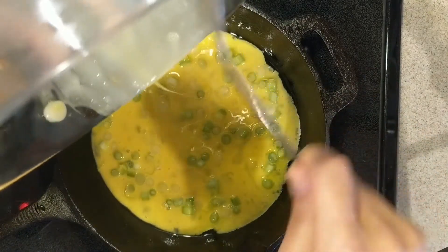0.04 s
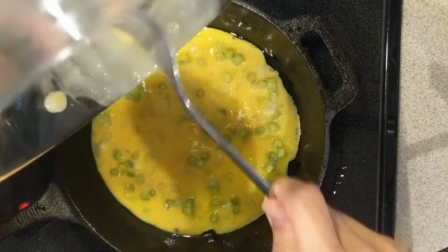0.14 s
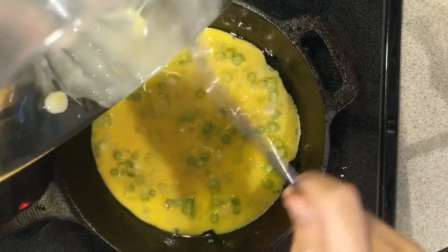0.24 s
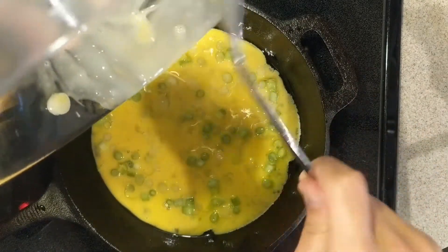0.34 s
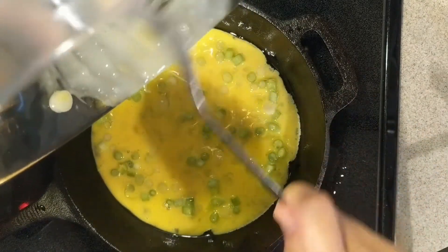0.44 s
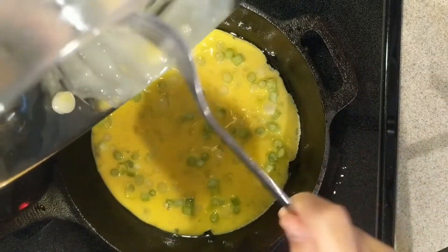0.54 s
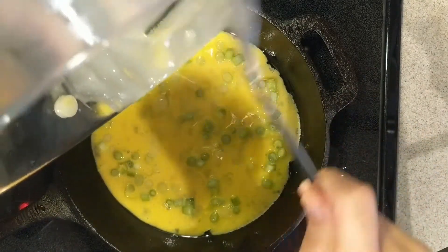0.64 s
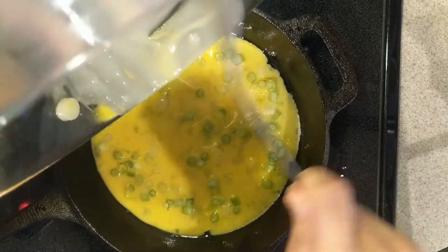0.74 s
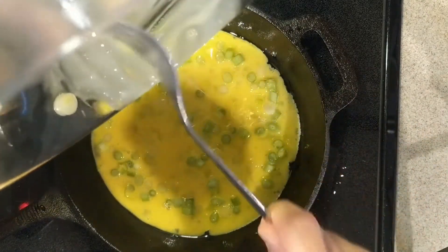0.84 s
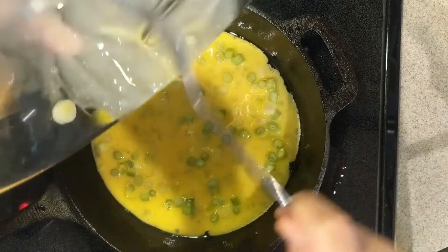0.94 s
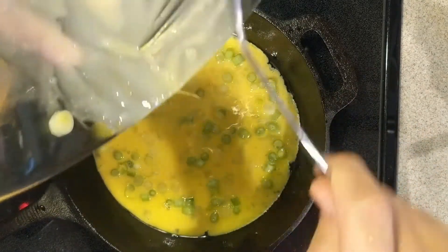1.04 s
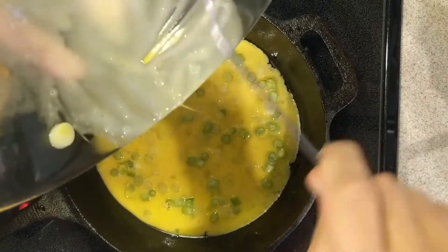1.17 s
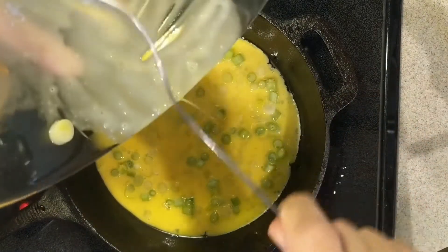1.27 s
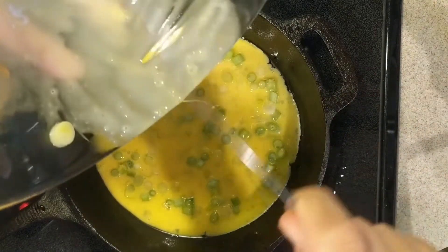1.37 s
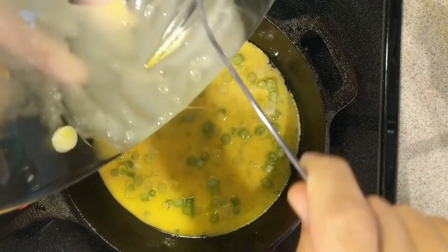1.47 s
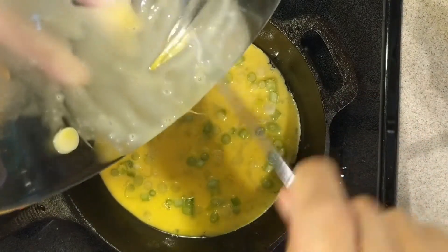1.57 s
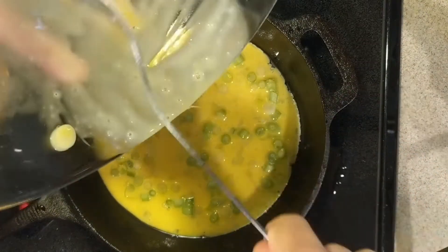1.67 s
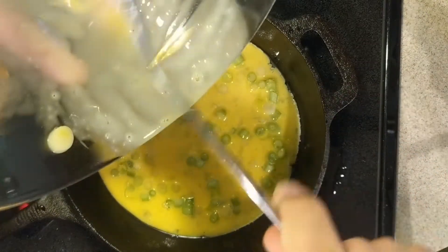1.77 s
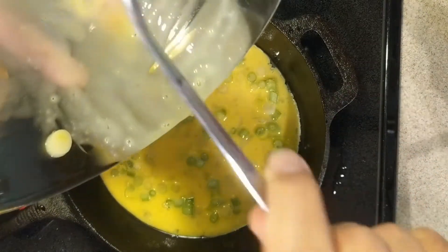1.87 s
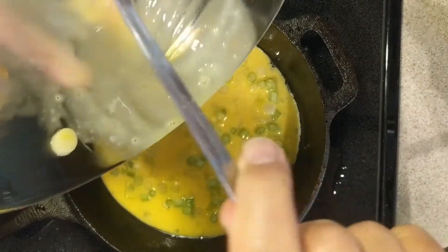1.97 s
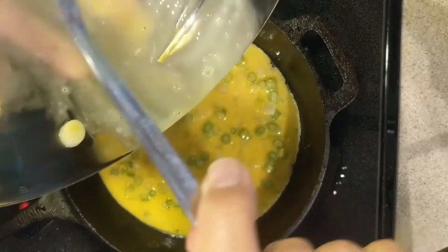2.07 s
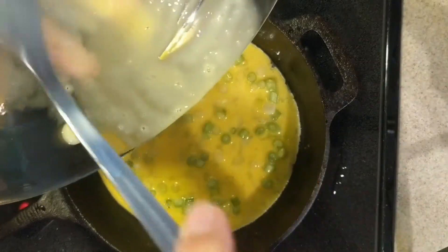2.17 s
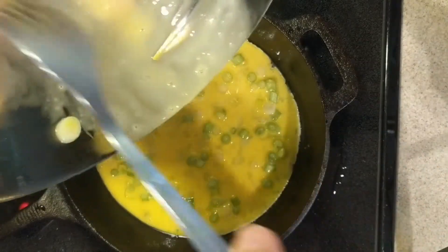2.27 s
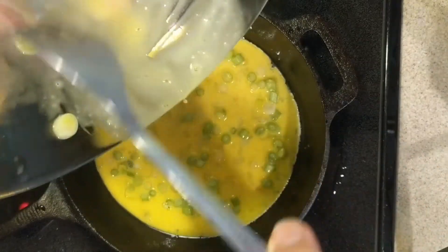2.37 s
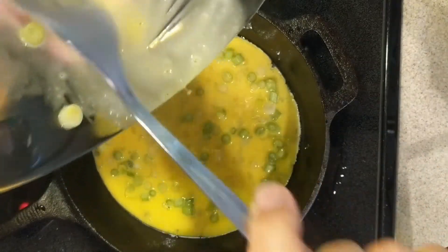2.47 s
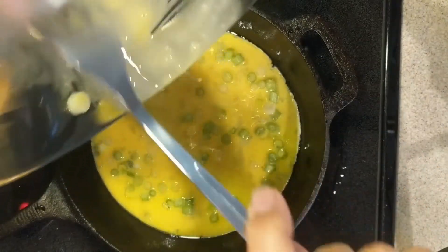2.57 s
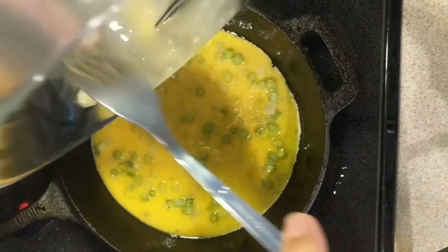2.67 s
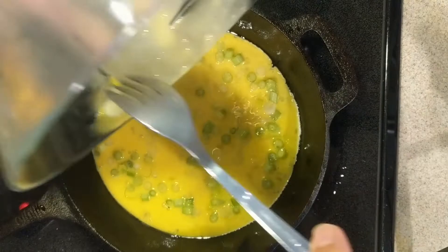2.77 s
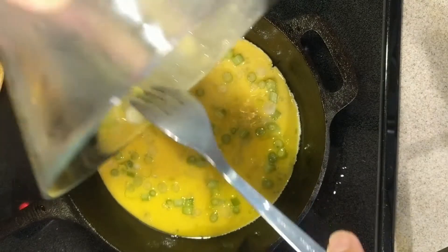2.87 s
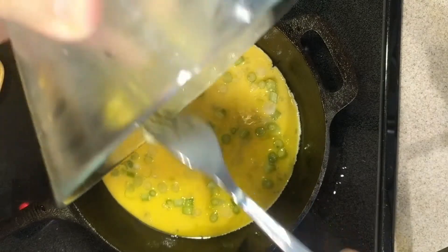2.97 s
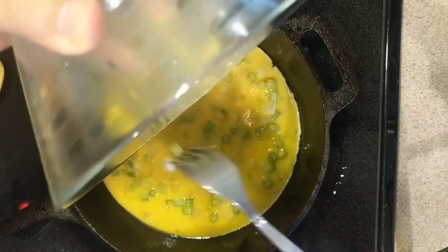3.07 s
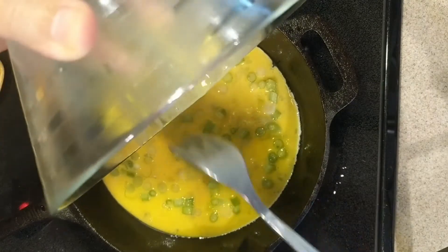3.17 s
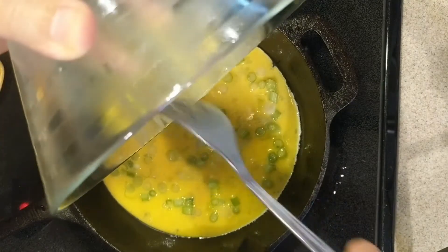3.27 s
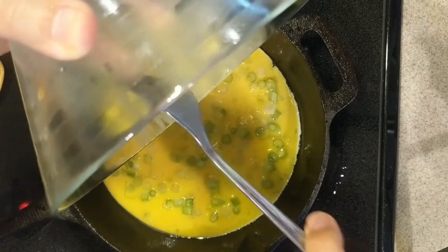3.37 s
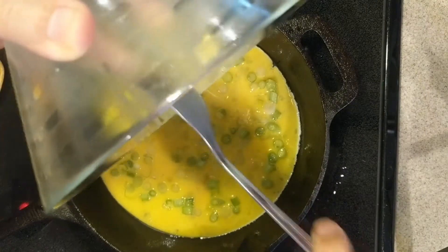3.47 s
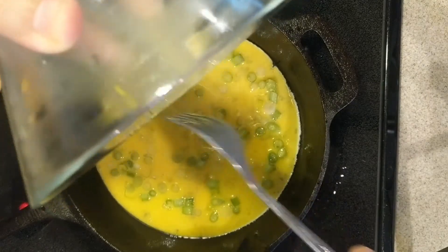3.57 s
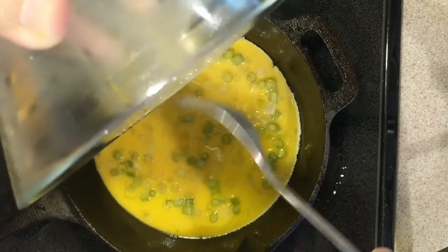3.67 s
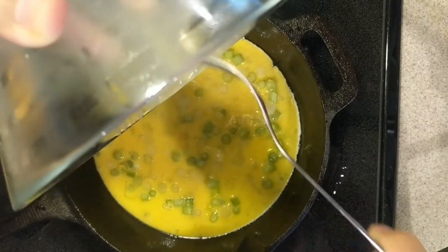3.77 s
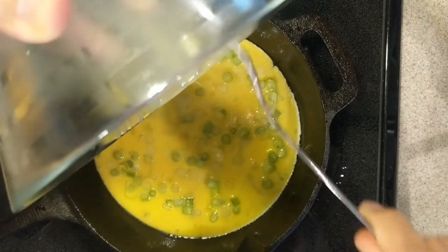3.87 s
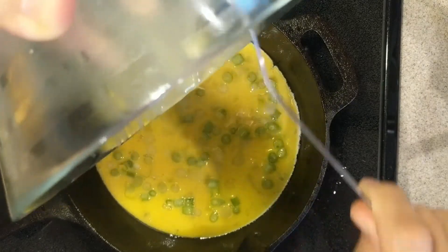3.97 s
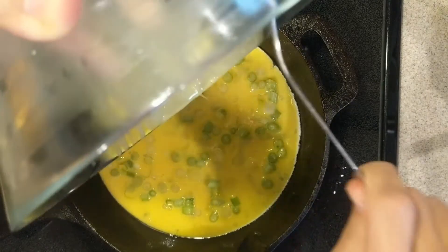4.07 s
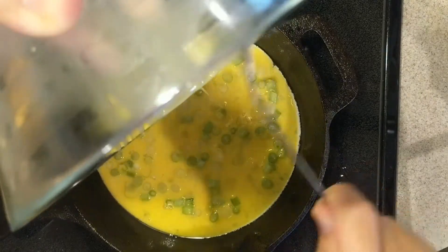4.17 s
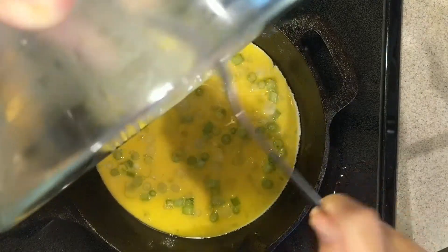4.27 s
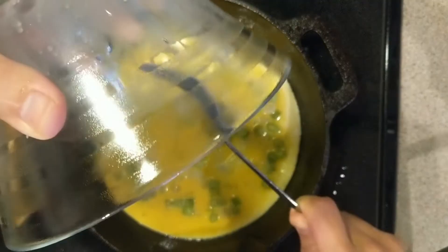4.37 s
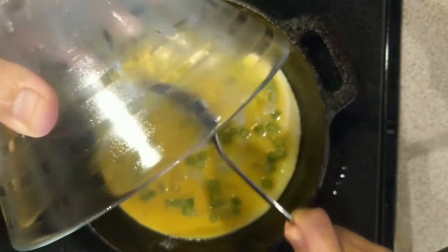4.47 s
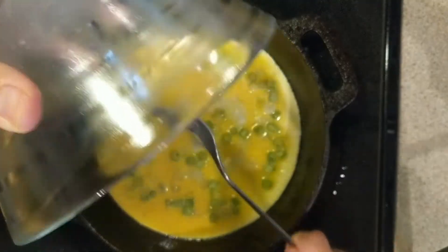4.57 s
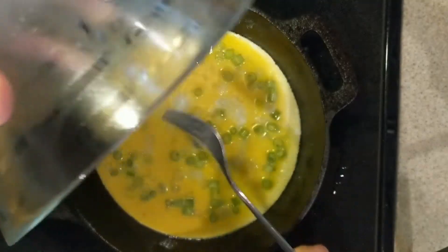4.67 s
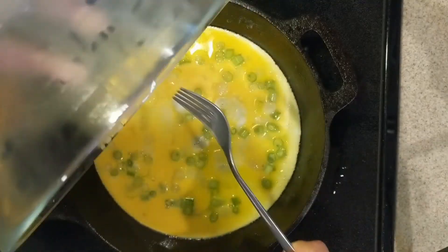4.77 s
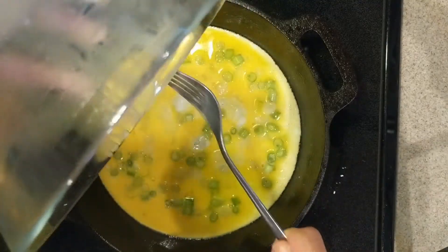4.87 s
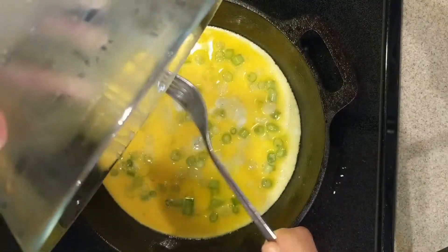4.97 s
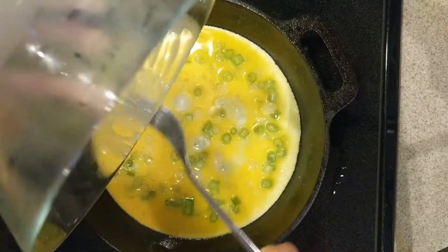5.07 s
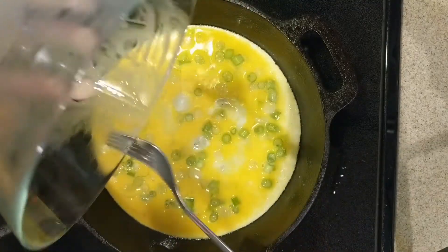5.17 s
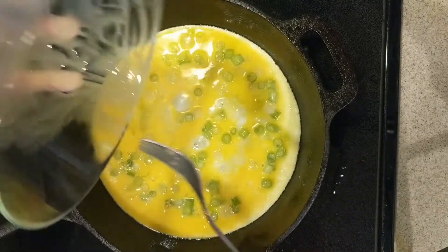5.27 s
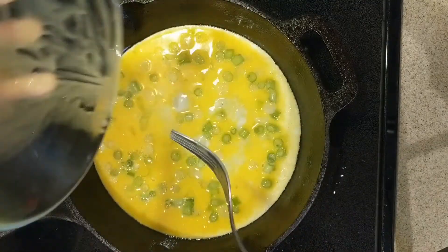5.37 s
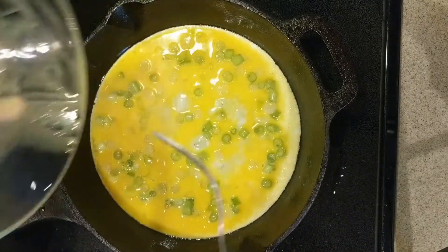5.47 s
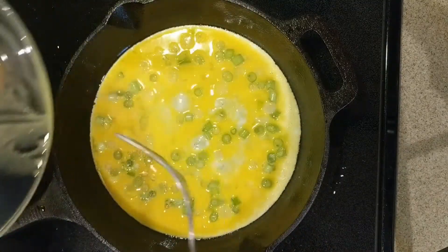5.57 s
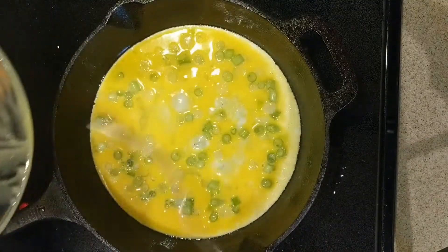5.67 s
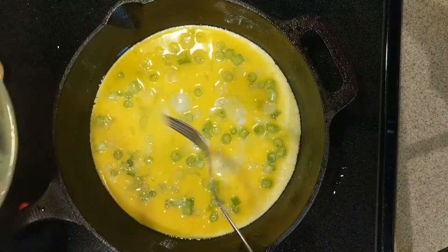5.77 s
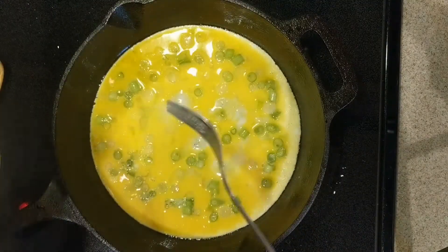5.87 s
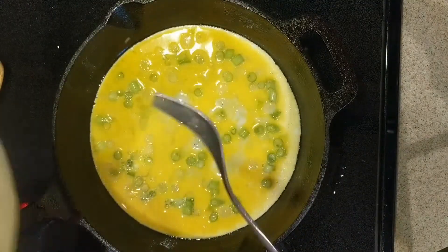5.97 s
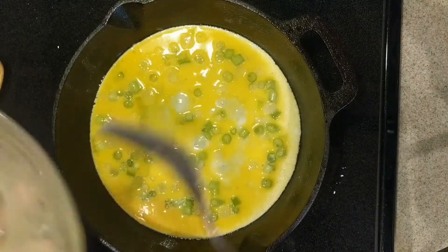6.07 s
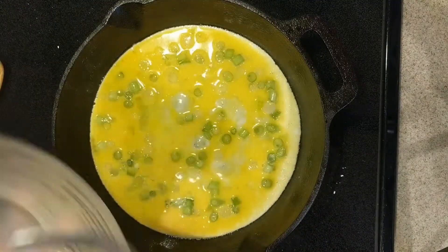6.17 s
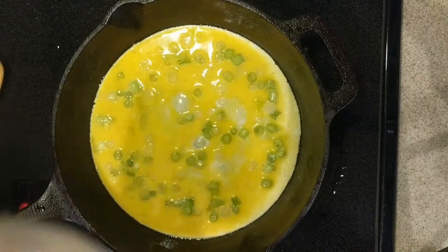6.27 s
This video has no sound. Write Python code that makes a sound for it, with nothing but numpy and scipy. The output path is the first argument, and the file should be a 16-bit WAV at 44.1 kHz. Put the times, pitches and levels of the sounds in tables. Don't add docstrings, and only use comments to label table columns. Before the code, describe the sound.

A close microphone in a small kitchen with light, short echo picks up a steel fork on a hand-held glass bowl. After a small tick at the very start, sharp bright clinks land at about 0.4, 0.75 and 1.1 seconds, ringing briefly with a beating shimmer. From 1.3 to 1.75 come light ticks and very faint squeaks and chatter. A duller double knock falls at 2.0, with a soft tap just after, and small ticks near 2.3. A clink at 2.6 has a fading gritty scrape. Strong ringing clinks follow at 3.5, 4.1, 4.4 with a quick scrape, and 5.0; a soft touch and scrape end them around 5.2. Underneath, egg bubbles faintly with tiny low pops, dwindling after 4.3. Quiet room rumble and mains hum continue, with a faint grainy steam puff around 6.1.

```python
import sys
import numpy as np
from scipy import signal
from scipy.fft import rfft, irfft
from scipy.io import wavfile
from scipy.ndimage import uniform_filter1d

SR = 44100
rng = np.random.default_rng(int(sys.argv[2]) if len(sys.argv) > 2 else 0)


def unload_wav(signal):
    wavfile.write(
        sys.argv[1],
        SR,
        np.round(np.clip(np.atleast_2d(signal).T, -1, 1) * 32767).astype(np.int16),
    )


def attenuation_scalar(level_db):
    decades = np.asarray(level_db, float) / 20
    return 10 ** decades


N = 279594

# pitch_hz, split_hz, ring_s (to -60 dB)
RIM_LOW = [(795, 12, .45), (1714, 18, .35), (2791, 20, .38), (4076, 17, .28)]
RIM_HIGH = [(5608, 28, .36), (7408, 84, .22), (9207, 208, .2), (11390, 190, .14)]
TINES = [(4500, 64, .12), (6722, 16, .16), (8046, 16, .13), (9672, 166, .17)]
# pitch_hz, level_db, ring_s
WALL = [(1529, -26, .3), (2050, -16, .07), (6400, -17, .13), (8550, -13, .1), (9490, -9, .15),
        (11000, -15, .12), (11925, -14, .11), (12900, -19, .14), (13830, -12, .17), (15150, -18, .06)]
SHANK = [(4100, -8.5, 0.009), (4790, 3, 0.016), (5000, -4, 0.0085)]
PRESSED = [(4900, -9, .035), (6400, 0, .04), (8000, -9, .05), (8800, -6, .03), (9300, -3, .05),
           (10300, -8, .03), (11550, -9, .03), (12900, -6, .035), (15200, -8, .03)]
RIM_DB = [-9, -8, -3.5, -4, -6.5, -3.5, 3.5, -9]
TINE_DB = [-4.5, -6.5, -1.5, 5]
NODE = 0.02

# start_s, force_db, hardness_db_per_octave, struck_degrees, listener_degrees (round the rim)
RIM_BLOWS = [(0.0, -45, -3.5, 45, 84), (0.409, -19, 3, 50, 62.7), (0.752, -19.5, 0.4, 0, 59.4),
             (1.138, -21, 3.5, 15.5, 33.6), (1.327, -48, -7, 53, 66.5), (1.738, -59.5, -11, 52, 68),
             (2.0, -44.5, -5.5, 15, 59), (2.0195, -41, -3, 19.5, 94), (2.128, -44, -7, 22, 82),
             (2.597, -35.5, 3, -2, 20.5), (2.664, -41, -7, 31.5, 46), (3.076, -58, -3.5, 0, 39),
             (3.484, -18, -6, 25.5, 43), (4.115, -20, 0.74, 35, 74.4), (4.4348, -27.5, 4.5, 7.5, 81.6),
             (5.008, -18.5, 1.5, 31.5, 73.5), (5.237, -42.5, -4.5, 0, 45.5)]
# time_s, share of energy (0-1) in the upper line of the low pairs, of the high pairs
TURN = [
    (0, .0, .02),
    (2.7, .05, .05),
    (3.48, 0.02, .02),
    (4.11, 0, .05),
    (4.43, 0.6, 0.41),
    (5.0, 0.88, 0.46),
]
# time_s, ring_time_factor
GRIP = [(0, 0.65), (.4, 0.59), (1.14, 0.66), (1.4, 0.94), (1.8, 0.79), (2.0, 0.43), (2.13, 0.32),
        (2.6, 0.66), (3.48, 1), (4.11, 0.65), (4.43, 0.86), (5.0, 0.59), (5.24, 0.7)]
HIGH_GRIP, FORK_GRIP = 0.84, 0.38
PALM_OFF_S, PALM_DB = 1.0, -13
# start_s, force_db, struck_degrees (along the tines), listener_degrees
TINE_BLOWS = [(0.411, -34, 5.0, 67), (0.7558, -30, 2.5, 70), (1.1363, -22, 28, 76), (1.5562, -46.3, 36, 74),
              (1.577, -54.5, 48, 77), (1.7121, -42, 70, 88), (1.74, -45.5, 53, 79),
              (2.0017, -24.5, 48, 67.5), (2.0191, -30, 30, 48), (2.1266, -38, 15, 38.5),
              (2.5974, -22.5, 10, 38), (2.665, -37, 21, 84), (3.49, -22, 32, 83), (4.1145, -21.5, 34.5, 82),
              (4.4341, -22, 40, 80), (5.009, -17.5, 24, 38)]
# start_s, thud_db, thud_hz, crack_db, clatter_db
CONTACTS = [(0.0004, -97, 900, -32, -70), (0.409, -18.5, 2730, 2.5, -8), (0.752, -20.5, 1769, 3, -23),
            (1.137, -38, 875, -10.5, -13), (1.327, -49, 1470, -58, -60), (1.5562, -70, 1200, -63.5, -30.5),
            (1.7121, -70, 1200, -60, -40), (1.738, -46, 1260, -60, -53), (2.0, -12.5, 894, -12, -19.5),
            (2.0192, -29, 500, -12, -23), (2.1275, -26, 910, -21.5, -32), (2.5963, -17, 736.6, -4, -8.5),
            (2.665, -43, 2510, -27, -26), (3.076, -57.5, 2000, -45.5, -70), (3.4845, -11, 1852, -11, -10.5),
            (4.1147, -31, 900, -4.5, -7.5), (4.4345, -22, 1910, -4, -11), (5.0085, -33, 700, -8, -6.5),
            (5.236, -32.5, 973, -60, -63.5)]
# pitch_hz, level_db
CRACK = [(180, -71), (300, -54.5), (1650, -11.5), (4950, -5.5), (5660, -19), (6690, -16), (9180, 6),
         (10300, -10.5), (15400, -34), (16200, -33)]
# start_s, level_db, tick_hz, tick_db, ring_db
TOUCHES = [(0.155, -43, 4300, -11, -1), (0.1715, -64, 5740, -1.5, 13), (0.9432, -56, 9130, -28.5, 6),
           (1.3003, -50.5, 1980, -2, 6), (1.3258, -23, 7150, -15.5, -28), (1.61, -46, 8100, -12, -11),
           (1.625, -41, 5590, -18, -7.5), (2.2718, -40.5, 10100, -9, -3), (2.2965, -52.5, 2657, -4.5, -7),
           (2.339, -47, 8530, -9.5, -21.5), (2.3522, -57, 4570, -8, -15), (3.0619, -50, 4210, -11.5, -1.5),
           (3.946, -47.5, 1930, -4.5, -1), (4.2844, -41.5, 5700, -44, 1), (4.6158, -29.5, 9220, -16, -13),
           (5.1804, -32, 4450, -27, -1)]

# start_s, length_s, first_slip_hz, last_slip_hz, level_db
SQUEAKS = [
    (1.309, 0.024, 2087, 1940, -54),
    (1.332, 0.058, 1317, 1273, -46.5),
    (1.618, 0.081, 5000, 6470, -70.5),
    (1.72, 0.015, 2130, 1680, -63.5),
    (1.731, 0.032, 1380, 1109, -54),
    (2.77, 0.076, 2516, 2150, -66),
    (5.029, 0.054, 1730, 1700, -58),
    (5.211, 0.015, 1980, 2040, -54),
]
# pitch_hz, level_db
SLIP_COLOUR = [(1000, 2), (2200, 8.5), (3500, -41.5), (5200, -4), (6500, 20), (7800, -7.5), (9200, 11.5),
               (13000, -0.5), (16000, -15.5)]
SQUEAK_RISE_S, SQUEAK_START_DB, SQUEAK_FALL_DB_PER_S = .014, -0.5, 108
ROUGH_START, ROUGH_PER_S = 0.13, 6.5
LOW_SLIP_HZ, LOW_SLOPE_DB, DULL_DB_PER_OCTAVE = 1300, -4, -20
# start_s, level_db, hold_s, release_s
SCRAPES = [
    (2.238, -52.5, 0.029, 0.015),
    (2.604, -30, 0.0022, 0.089),
    (2.655, -42.5, 0.0048, 0.085),
    (4.446, -21, 0.0036, 0.028),
    (5.229, -28, 0.059, 0.038),
]
CHATTER = [
    (1.334, -58, 0.0035, .075),
    (1.553, -58, 0.0018, .04),
    (1.706, -60, .002, .036),
    (1.734, -55, 0.0017, .036),
]
STROKE_RISE_S, STROKE_START_DB, STROKE_END_DB = 0.0071, -2, -32.5
GLASS_HOLD = .7

# time_s, level_db
SIZZLE = [(0.0, -65), (.7, -64.5), (2.0, -66.5), (2.5, -66.5), (3.3, -68.5), (4.3, -68.5), (4.7, -77),
          (5.4, -74), (6.34, -79.5)]
# start_s, level_db, pitch_hz
POPS = [(0.096, -55.5, 1110), (0.343, -57.5, 845), (0.375, -58, 1050), (0.389, -56.5, 810),
        (0.485, -54, 940), (0.585, -56.5, 886), (0.64, -58.5, 917), (0.893, -57.5, 850),
        (0.945, -52.5, 920), (1.235, -46.5, 965), (1.883, -57.5, 930), (2.11, -53, 855),
        (2.411, -58.5, 894), (2.456, -55, 858), (2.53, -54.5, 926), (3.009, -59, 924), (3.054, -54.5, 800),
        (3.199, -51.5, 888), (3.228, -50, 888), (3.72, -61.5, 945), (3.828, -59.5, 927),
        (3.946, -56.5, 906), (4.26, -54.5, 805), (4.326, -58.5, 754)]
# time_s, level_db
HISS = [
    (6.0, -85),
    (6.06, -71.5),
    (6.13, -70),
    (6.2, -81.5),
]
# pitch_hz, fade_s (to -60 dB)
KITCHEN = [(200, 0.12), (1000, 0.27), (4000, 0.34), (9000, 0.33), (16000, 0.06)]
# pitch_hz, level_db
ROOM_AIR = [(15, -44.5), (25, -15.5), (65, -4), (218, -17.5), (257, -16.5), (418, -18.5), (466, -16.5),
            (611, -22.5), (943, -19.5), (1110, -26.5), (1240, -25), (3280, -27.5), (16200, -41)]
AIR_DB = -64.5
# pitch_hz, level_db
HUM = [
    (59, -74.5),
    (118, -86),
]
EDGE_HZ = 16300


def evened(x):
    return x / np.sqrt(np.mean(x ** 2) + 1e-20)


def read(points, hz):
    f, value = np.transpose(points)
    return np.interp(np.log(hz + 1), np.log(f + 1), value)


def add(mix, s, sound):
    part = mix[max(round(s * SR), 0):][:len(sound)]
    part += sound[:len(part)]


def coloured(x, points):
    gain = attenuation_scalar(read(points, np.fft.rfftfreq(len(x), 1 / SR)))
    return irfft(rfft(x) * gain, len(x))


def slow_wander():
    t = np.arange(18000) / SR
    return np.interp(t, np.linspace(0, .41, num=50), uniform_filter1d(rng.standard_normal(50), size=2))


def ring(hz, db, t60, start=None):
    t = np.arange(18000) / SR
    waver, drift = slow_wander(), slow_wander()
    loose = np.minimum(t / .09, 1) * min(.45 + hz / 9000, 1.2)
    fade = attenuation_scalar(-60 * t / t60 + 5.8 * waver * loose) + 0.75 * attenuation_scalar(-60 * t / 0.016)
    first_turn = rng.random() if start is None else start
    phase = 2 * np.pi * (hz * t + first_turn) + 1.4 * drift * loose
    return attenuation_scalar(db) * fade * np.sin(phase) * np.minimum(t / .0012, 1)


def pairs(modes, levels_db, hold=1, upper=0.08):
    share = np.clip(upper + rng.uniform(-0.043, 0.38, len(modes)), .01, .99)
    starts = rng.random(len(modes))
    out = 0
    for (hz, split, t60), db, a, start in zip(modes, levels_db, share, starts):
        out = out + np.sqrt(1 - a) * ring(hz - split / 2, db, hold * t60, start)
        out = out + np.sqrt(a) * ring(hz + split / 2, db, hold * t60, start)
    return out


def nodes(first, levels_db, degrees):
    angle = (first + np.arange(len(levels_db))) * np.radians(degrees)
    return np.add(levels_db, 10 * np.log10(np.cos(angle) ** 2 + NODE))


def burst(db, t60, colour, rise=0.00031):
    t = np.arange(8192) / SR
    start = np.sin(np.pi / 2 * np.minimum(t / rise, 1)) ** 2
    return attenuation_scalar(db - 60 * t / t60) * start * evened(coloured(rng.standard_normal(len(t)), colour))


def rim_blows():
    out = np.zeros(N)
    octaves = np.log2(np.transpose(RIM_LOW + RIM_HIGH)[0] / 3000)
    turn_s, low_share, high_share = np.transpose(TURN)
    low = len(RIM_LOW)
    for s, db, hard_db, struck, heard in RIM_BLOWS:
        grip = np.interp(s, *np.transpose(GRIP))
        levels_db = db + hard_db * octaves + nodes(1.948, nodes(1.8, RIM_DB, struck), heard)
        levels_db[0] += PALM_DB * (s < PALM_OFF_S)
        add(out, s, pairs(RIM_LOW, levels_db[:low], grip, np.interp(s, turn_s, low_share)))
        add(out, s, pairs(RIM_HIGH, levels_db[low:], HIGH_GRIP * grip, np.interp(s, turn_s, high_share)))
    return out


def tine_blows():
    out = np.zeros(N)
    for s, db, struck, heard in TINE_BLOWS:
        levels_db = db + nodes(0.94, nodes(0.98, TINE_DB, struck), heard)
        add(out, s, pairs(TINES, levels_db, FORK_GRIP))
        add(out, s, sum(ring(hz, levels_db[0] - 3.5 + g, t60) for hz, g, t60 in SHANK))
    return out


def contacts():
    out = np.zeros(N)
    clatter = [(2000, -21), (5000, -5.0), (9700, -2.5), (10500, -12.5), (16000, -32)]
    for s, thud_db, hz, crack_db, clatter_db in CONTACTS:
        thud = [(80, -40), (300, -12), (hz / 1.5, -8), (hz, 0), (hz * 1.5, -14), (hz * 3, -40)]
        add(out, s, burst(thud_db - 12, .025, thud, rise=.0012))
        for wall_hz, g, t60 in WALL:
            wall_db = crack_db - 26.0 + g + 3 * rng.standard_normal()
            add(out, s, ring(wall_hz, wall_db, FORK_GRIP * t60))
        add(out, s, burst(crack_db - 20.5, 0.036, CRACK))
        add(out, s, burst(clatter_db - 22.0, 0.085, clatter))
    return out


def touches():
    out, modes = np.zeros(N), RIM_LOW[1:] + RIM_HIGH[:3] + TINES
    for s, db, hz, tick_db, ring_db in TOUCHES:
        add(out, s, burst(db + tick_db, 0.0078, [(hz / 3, -30), (hz, 0), (hz * 2.5, -30)]))
        near_db = -9 * np.log2(np.transpose(modes)[0] / hz) ** 2
        levels_db = db + ring_db + near_db + 3 * rng.standard_normal(len(modes)) - 20
        add(out, s, pairs(modes, levels_db, hold=0.23))
    return out


def glass(drive):
    levels_db = [-34, 3.5, -2.5, 7, 7.5, 14.0, 19.0, 1.5, -24, 3.5, -6.0, 16.5]
    body = pairs(RIM_LOW + RIM_HIGH + TINES, levels_db, hold=GLASS_HOLD)
    body += sum(ring(hz, db + 7, t60) for hz, db, t60 in WALL)
    return signal.fftconvolve(drive, body / np.linalg.norm(body))[:N]


def squeak(length, first_hz, last_hz, top_db):
    t = np.arange(0, length, 1 / SR)
    hz = first_hz + (last_hz - first_hz) * t / length
    rise_db = SQUEAK_START_DB * np.maximum(1 - t / SQUEAK_RISE_S, 0)
    fall_db = SQUEAK_FALL_DB_PER_S * np.maximum(t - SQUEAK_RISE_S, 0)
    rough = ROUGH_START + ROUGH_PER_S * t
    tilt_db = LOW_SLOPE_DB + DULL_DB_PER_OCTAVE * np.log2(hz / LOW_SLIP_HZ)
    wobble, grip = (evened(uniform_filter1d(rng.standard_normal(len(t)), 60)) for _ in range(2))
    hz = hz * (1 + 0.089 * rough * wobble)
    turns = np.cumsum(hz) / SR
    stack = np.zeros(len(t))
    for k in range(1, 13):
        size = attenuation_scalar(read(SLIP_COLOUR, k * hz) + tilt_db * np.log2(k)) * (k * hz < 16000)
        stack += size * np.cos(2 * np.pi * k * turns)
    level = attenuation_scalar(top_db + rise_db - fall_db + 8 * rough * np.tanh(grip))
    return level * evened(stack) * signal.windows.tukey(len(t), .15)


def catches(strokes, per_s):
    out = np.zeros(N)
    for s, db, hold, release in strokes:
        corners = np.cumsum([0, STROKE_RISE_S, hold, release])
        t = np.arange(0, corners[-1], 1 / SR)
        clicks = rng.standard_normal(len(t)) * (rng.random(len(t)) < per_s / SR)
        shape_db = np.interp(t, corners, [STROKE_START_DB, 0, 0, STROKE_END_DB])
        add(out, s, attenuation_scalar(db + shape_db) * evened(clicks))
    return out


def chatter():
    t = np.arange(4096) / SR
    tines = sum(attenuation_scalar(db - 60 * t / t60) * np.sin(2 * np.pi * hz * t) for hz, db, t60 in PRESSED)
    return signal.oaconvolve(catches(CHATTER, per_s=2500), tines / np.linalg.norm(tines))[:N]


def friction():
    slips = np.zeros(N)
    for s, *stroke in SQUEAKS:
        add(slips, s, squeak(*stroke))
    grit_colour = [(500, -51.5), (2000, 1.5), (9500, -10.5), (11000, -10.0), (16000, -13.5)]
    grit = coloured(catches(SCRAPES, per_s=870), grit_colour)
    direct_grit = coloured(grit, [(1000, 0), (9800, 0), (10400, -30), (16000, -40)])
    squeaks = slips + attenuation_scalar(-12) * glass(slips)
    scrapes = attenuation_scalar(-16) * direct_grit + attenuation_scalar(-8) * glass(grit)
    return squeaks + scrapes + chatter()


def bubble(hz, cycles):
    u = np.arange(int(3 * cycles / hz * SR)) * hz / SR / cycles
    swell = np.e * 2 * u * np.exp(-2 * u)
    return swell * np.sin(2 * np.pi * cycles * u * (1 + 0.017 * u))


def egg():
    out = np.zeros(N)
    for hz in np.geomspace(550, 2200, 24):
        size = attenuation_scalar(2.5 * np.minimum(rng.exponential(1, N), 4)) * (rng.random(N) < 70 / SR)
        out += attenuation_scalar(-9 * np.log2(hz / 900) ** 2) * signal.oaconvolve(size, bubble(hz, cycles=2.9))[:N]
    s, db = np.transpose(SIZZLE)
    out = evened(out) * attenuation_scalar(np.interp(np.arange(N) / SR, s, db) - 4.0)
    for s, db, hz in POPS:
        add(out, s, attenuation_scalar(db + 3.0) * bubble(hz, cycles=2.2))
    return out


def steam():
    grains = rng.standard_normal(N) * (0.43 + 3 * (rng.random(N) < 900 / SR))
    s, db = np.transpose(HISS)
    level = attenuation_scalar(np.interp(np.arange(N) / SR, s, db, -150, -150))
    colour = [(300, -19.5), (1200, 3), (3500, -2.5), (10000, -17.5), (16000, -25)]
    return level * evened(coloured(grains, colour))


def kitchen(x):
    taps = np.zeros(SR // 2)
    at = np.arange(130, len(taps) - 20, 20)
    taps[at + rng.integers(0, 20, len(at))] = rng.choice([-1., 1.], len(at))
    hz, t, z = signal.stft(taps, SR, nperseg=128)
    fade = attenuation_scalar(-60 * t / read(KITCHEN, hz)[:, None])
    tail = signal.istft(z * fade, SR, nperseg=128)[1]
    return signal.fftconvolve(x, tail / np.linalg.norm(tail))[:N]


def air():
    t = np.arange(N) / SR
    waver = evened(uniform_filter1d(uniform_filter1d(rng.standard_normal(N), 1500), 1500))
    hum = sum(attenuation_scalar(db + 4.5 + 1.6 * waver) * np.sin(2 * np.pi * hz * t) for hz, db in HUM)
    return attenuation_scalar(AIR_DB - 2.5) * evened(coloured(rng.standard_normal(N), ROOM_AIR)) + hum


def scene():
    taps = rim_blows() + tine_blows() + contacts() + touches()
    near = taps + friction() + egg() + steam()
    return (near + attenuation_scalar(-14.5) * kitchen(near) + air())[None]


def top_cut(x):
    return signal.sosfilt(signal.butter(12, 16530, fs=SR, output="sos"), x)


def record(dry):
    bass_cut = signal.butter(2, 40, "high", fs=SR, output="sos")
    edge = signal.firwin(511, EDGE_HZ, window=("kaiser", 9), fs=SR)
    mix = signal.oaconvolve(signal.sosfilt(bass_cut, dry), edge[None], "same")
    return top_cut(mix)


dry = scene()
out = record(dry)
unload_wav(out)
```